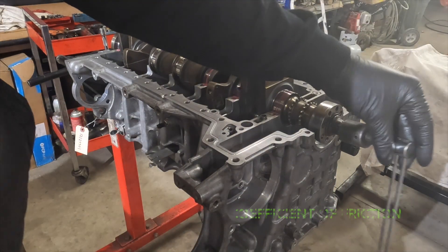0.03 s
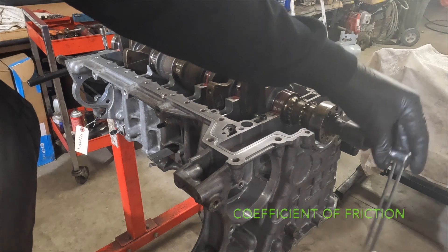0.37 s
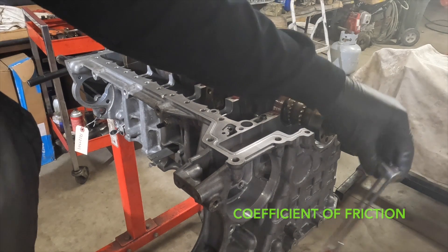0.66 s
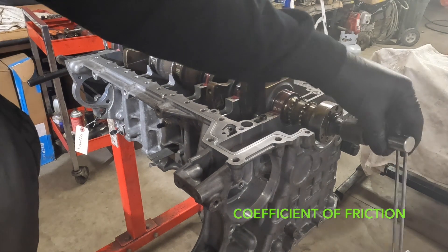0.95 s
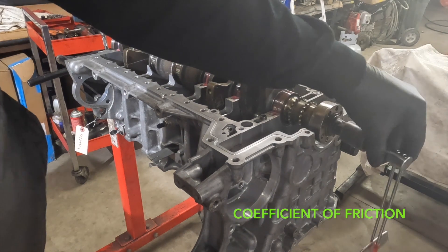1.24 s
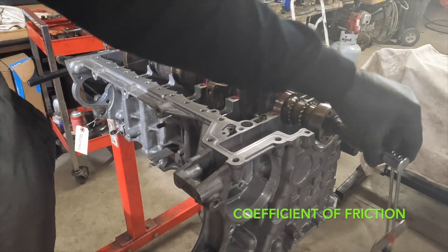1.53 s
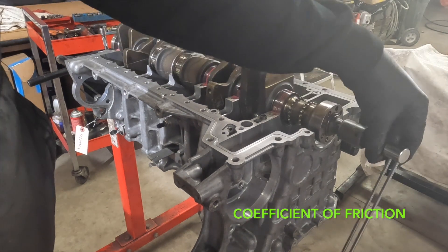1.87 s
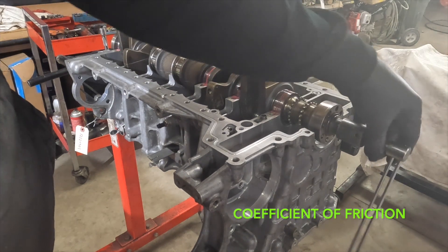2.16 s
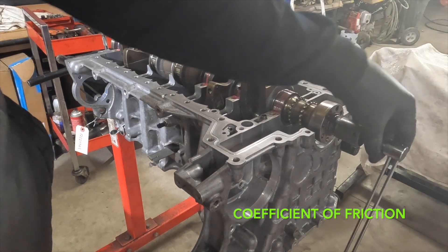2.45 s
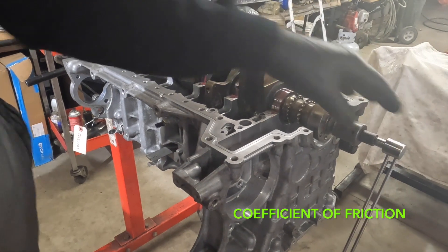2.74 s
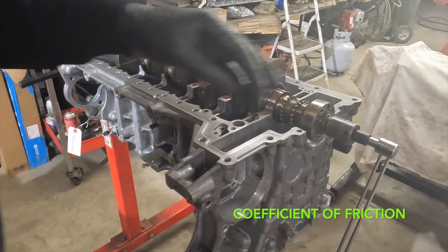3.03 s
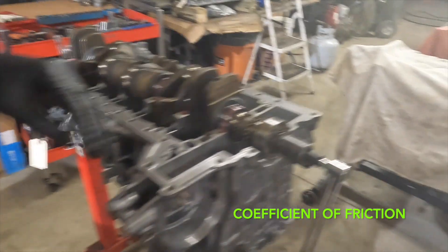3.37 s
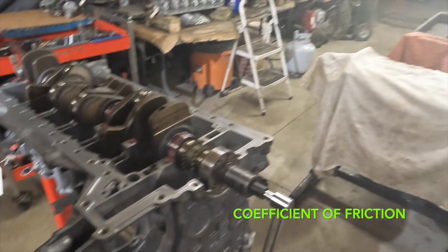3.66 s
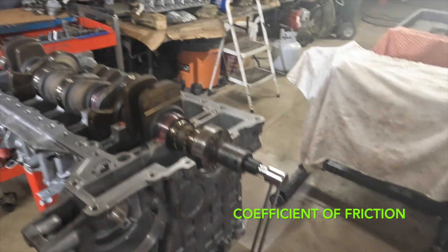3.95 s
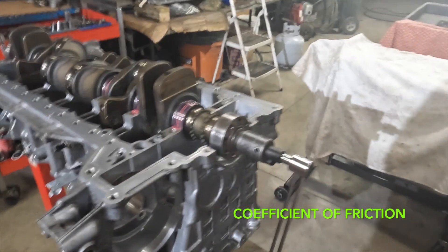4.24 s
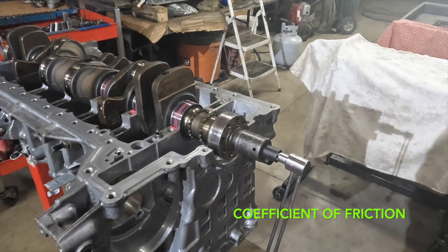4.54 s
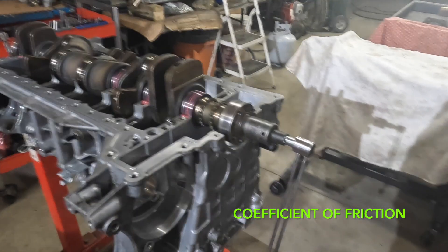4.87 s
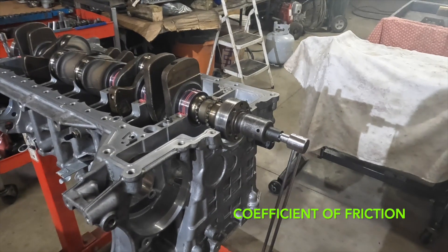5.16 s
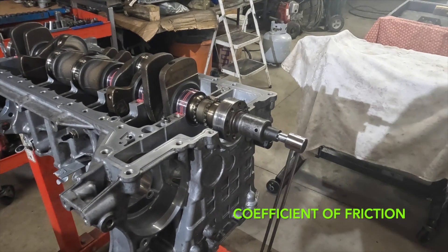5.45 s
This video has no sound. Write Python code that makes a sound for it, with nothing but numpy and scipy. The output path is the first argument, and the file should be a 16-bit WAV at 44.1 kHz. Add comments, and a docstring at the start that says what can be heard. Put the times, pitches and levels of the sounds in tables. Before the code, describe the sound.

A low, steady workshop room tone runs throughout. Right at the start, a quick cluster of steel clicks sounds as a socket and wrench meet an engine's crankshaft, each ringing briefly with a slight room echo. Lighter ticks and faint sliding scrapes follow, with clicks near 0.5, 0.8 and 1.2 seconds, a sharp one at 1.8 and another at 2.3. A sleeve then brushes softly past.

From about 2.8 seconds a gloved hand takes the microphone's mount, and a very close, low rumble begins, with rubbing and cloth swishes. Dull knocks land around 3.5 seconds. The loudest thumps come at 4.1 and 4.3, along with small plastic snaps and glove scuffs. More rubbing leads to another knock near 4.9 seconds. The rumble eases after about 5.3 seconds, leaving a soft fabric swish to the end.

```python
"""First a socket and torque wrench are worked onto the nose of a crankshaft in a workshop:
steel clicks on steel, and the tool and engine block ring. After about two seconds a sleeve brushes
past the camera. Then a gloved hand takes hold of its mount and re-aims it, so the mount rumbles,
rubs and knocks right at the microphones. A low room tone lies under it all."""
import sys
import numpy as np
from scipy import signal
from scipy.fft import rfft, irfft, next_fast_len
from scipy.io import wavfile
from scipy.ndimage import uniform_filter1d

SR = 44100
rng = np.random.default_rng(int(sys.argv[2]) if len(sys.argv) > 2 else 0)


def store_pcm(level_fs):
    """Save levels as 16-bit WAV."""
    pcm = np.round(np.clip(level_fs, -1, 1) * 32767).astype(np.int16)
    wavfile.write(sys.argv[1], SR, np.atleast_2d(pcm).T)


N = 242902
T = np.arange(N) / SR

# The functions shift the levels below up or down. A fade time (t60) is the time to fall by 60 dB.
# steel hits steel: (time [s], middle [dB], low body [dB], bright edge [dB], crankshaft ring [dB])
CLICKS = [(0.1491, -22, -36, -42.5, -53), (0.1712, -24, -34.5, -38.5, -43), (0.1993, -31, -39.5, -49, -46),
          (0.242, -24.5, -33.5, -46, -43), (0.4827, -42, -46.5, -81, -63), (0.5428, -33.5, -41, -61, -51),
          (0.619, -54, -51, -76, -80), (0.6814, -53, -58, -68, -82), (0.6943, -49, -54.5, -68, -64),
          (0.841, -33, -41, -63.5, -39), (0.9202, -45.5, -42, -70, -67), (1.2226, -41, -44, -60.5, -61),
          (1.5473, -66, -68, -91, -67), (1.6329, -52.5, -52.5, -76, -60), (1.8145, -18.5, -28.5, -37, -46),
          (1.8212, -36, -37.5, -49, -40), (2.0782, -65, -55, -73, -63), (2.151, -43, -43.5, -67, -56.5),
          (2.245, -51, -54.5, -67.5, -76), (2.2862, -40.5, -36.5, -49, -47), (2.3, -32, -31.5, -49.5, -39)]
# ringing tones of wrench and block, crankshaft, and socket: (pitch [Hz], level [dB], fade time [s])
STEEL_TONES = [(1125, -12, .16), (1265, -2, .14), (1744, -12, .2), (2056, -11, .16), (2168, -5, .12),
               (2307, -1, .1), (2400, -2, .12), (2546, -10, .2), (2605, -1, .16), (3133, -2, .16),
               (3210, -11, .2), (3628, -15, .17), (7111, -10, .05), (7569, -8, .05)]
CRANK_TONES = [(674, 3, 0.13), (712, 19, 0.18), (750, 3, .06)]
SOCKET_TONES = [(3900, -6, .12), (4050, 3, .15), (4337, -3, .19), (4480, -1, .18), (4720, -9, .14),
                (4768, -9, .15), (4968, -6, .16)]
# the burst of noise in a click: (frequency [Hz], level [dB])
CLICK_COLOUR = [(200, -13.5), (320, 3.5), (400, -5.5), (500, 5.5), (620, -3), (900, 0), (1300, 7),
                (1650, 3.5), (2400, 16), (3700, 2), (4600, 1), (5800, -6), (7600, -23.5), (9000, -28.5),
                (15000, -53.5)]
# the socket slides on its seat; the two short rows at 0.235 s and 1.803 s are weak clicks, sounded as brief
# grainy bursts: (middle time [s], half length [s], level [dB], pitch [Hz])
SLIDES = [(.235, 0.013, -42, 2330), (.51, 0.08, -60, 5760), (0.499, 0.12, -60, 1900),
          (0.821, 0.093, -59.5, 2340), (1.719, 0.21, -70.5, 2230), (1.803, 0.016, -38.5, 1610),
          (2.307, 0.023, -42.5, 6100)]

# the hand pushes the mount:
# (time [s], rise [s], hold [s], sway [dB], shudder [dB], rubbing [dB], left minus right [dB])
PUSHES = [(2.775, 0.031, 0.13, -27, -40, -70.5, -5), (2.94, 0.048, 0.072, -30.5, -40.5, -60, -17.5),
          (3.14, 0.079, 0.078, -26.5, -45, -62, -5), (3.412, 0.084, 0.056, -18.5, -31, -53.5, -5.5),
          (4.088, 0.03, 0.0093, -23, -27, -45, -1), (4.299, 0.016, .11, -24, -27, -66, -2),
          (4.608, 0.18, 0.094, -28, -27.5, -40.5, 3), (4.917, 0.023, 0.021, -26.5, -23, -60, 1.5),
          (5.124, 0.088, 0.028, -27, -31.5, -50, -0.5)]
# the swaying mount, its shuddering arm and the rubbing glove: (frequency [Hz], level [dB])
SWAY_COLOUR = [(15, -23.5), (28, -2), (38, 4.5), (55, -3.5), (80, -13.5), (130, -30.5), (400, -94)]
SHUDDER_COLOUR = [(50, -19.5), (90, -3), (112, 2), (140, -4.5), (210, -7.5), (260, -24.5), (310, -19.5),
                  (380, -36.5), (800, -76)]
RUB_COLOUR = [(70, -7.5), (125, 19), (220, 4.5), (300, 5), (380, -10), (560, -1), (680, -3.5), (850, -19.5),
              (1070, 0.5), (1300, -42), (1600, -20), (2300, -27.5), (4000, -60)]
# knocks on the mount: (time [s], thud [dB], casing [dB], left minus right [dB])
KNOCKS = [(2.955, -35, -53.5, 0), (3.247, -42, -49.5, -11.5), (3.497, -25, -38.5, 2),
          (3.524, -24, -51, -16), (3.989, -30.5, -42, 3), (4.071, -32, -40, 0.5),
          (4.122, -14.5, -27.5, -11), (4.312, -17, -31, -4.5), (4.35, -22.5, -37.5, 0.5),
          (4.437, -24, -49.5, -4), (4.505, -32.5, -54, 2.5), (4.596, -43, -56, 3.5),
          (4.671, -30.5, -46.5, 2), (4.938, -21, -31.5, 1.5), (5.014, -50.5, -49, 4), (5.03, -46, -47, 1),
          (5.202, -32.5, -69, 7)]
# ringing tones of the mount, its arm and the camera casing: (pitch [Hz], level [dB], fade time [s])
MOUNT_TONES = [(37.7, 29, 0.4), (57.6, -17, 0.25)]
ARM_TONES = [(111, 14.5, 0.093), (155, 12, 0.063), (200.3, 7, 0.24), (283.3, -4, 0.34)]
CASING_TONES = [(420, -13.5, 0.082), (501, -12, 0.19), (566, -1, 0.053), (690, 21.5, 0.0068),
                (993, 1, 0.038), (1062, 1, 0.1), (1280, -18, .02), (1560, -5.5, 0.038)]
# plastic joints snap: (time [s], level [dB], pitch [Hz])
SNAPS = [(3.371, -38, 3350), (3.9913, -54, 2420), (4.0705, -42, 1380), (4.1223, -26.5, 2060),
         (4.1227, -34, 5300), (4.3615, -41, 2600), (4.3624, -54, 8500), (4.954, -49.5, 13500),
         (4.9535, -47.5, 3480), (5.013, -54, 2480)]

# strokes of sleeve and glove:
# (time [s], rise [s], hold [s], fade time [s], swish [dB], hiss [dB], swish left minus right [dB])
STROKES = [(2.2, 0.39, .5, 4.4, -64.5, -60.5, 20.5), (3.261, 0.12, 0.0084, 0.51, -45.5, -59.5, 4),
           (3.49, 0.021, 0.017, 0.46, -53, -47.5, 5.5), (3.862, 0.16, 0.021, 0.47, -49, -48.5, 9.5),
           (4.053, 0.076, 0.016, 0.15, -45, -45.5, 12), (4.132, 0.081, 0.013, 1.11, -60, -62.5, 19),
           (4.663, 0.019, 0.032, 0.29, -50, -69.5, 1.5), (4.703, 0.073, 0.19, 0.084, -59.5, -75, 3.5),
           (4.999, .02, 0.015, 0.2, -57, -73, 4), (5.118, 0.13, 0.0084, 0.28, -44.5, -64, 5),
           (5.264, 0.3, .05, .5, -47.5, -60, 5)]
# the cloth's coarse swish and fine hiss: (frequency [Hz], level [dB])
SWISH_COLOUR = [(400, -18), (850, -7.5), (1300, 4.5), (2200, 2), (4200, -2.5), (5500, -9), (8000, -31.5)]
HISS_COLOUR = [(3000, -6.5), (5300, -0.5), (7200, -5), (9000, -14), (11000, -18.5), (12300, -17),
               (14000, -29), (15500, -64)]
# the glove scuffs the casing: (middle time [s], half length [s], level [dB], pitch [Hz])
SCUFFS = [(3.052, 0.034, -48, 2870), (3.52, 0.055, -48.5, 536), (4.01, 0.038, -42.5, 3620),
          (4.078, 0.01, -40, 1320), (4.135, 0.027, -29, 290), (4.145, 0.036, -36.5, 470),
          (4.83, 0.03, -56, 1580), (4.97, 0.034, -35, 208), (5.18, 0.046, -46.5, 1580)]

# the building's murmur: (frequency [Hz], level [dB])
ROOM_COLOUR = [(15, -21), (30, 3), (62, 1), (110, -12.5), (180, -13), (300, -16), (450, -25.5),
               (750, -33.5), (1300, -32.5), (3200, -44), (7000, -43), (10500, -53), (15000, -59)]
# how the left microphone opening shapes the sound: (frequency [Hz], boost [dB])
PORT_COLOUR = [(20, -1), (7000, -1.5), (10500, 1), (12200, 5.5), (14000, 2)]


def wrench(clash_t60=0.059, crack_t60=0.01, rise_s=0.00033):
    """Each contact cracks, sets off the block's many tones and leaves crankshaft and socket ringing."""
    out, t = scrapes(SLIDES, grain_db=4.5), T[:SR // 3]
    fade = (undb(-60 * t / clash_t60) + undb(3 - 60 * t / crack_t60)) * (1 - np.exp(-t / rise_s))
    for s, middle, body, edge, crank in CLICKS:
        clash = colour(noise(len(t), 0.268) * fade, CLICK_COLOUR)
        hit = clash + undb(-13) * ring(STEEL_TONES, t, scatter_db=1.5, detune=0.006)
        # where and how hard the parts meet sets the share of low, middle and high sound
        add(out, s, peak(band(hit, 200, 1615, order=3), body))
        add(out, s, peak(band(hit, 1740, 3710, order=3), middle - 2))
        add(out, s, peak(band(hit, 5700, 12900, order=4), edge))
        add(out, s, peak(ring(CRANK_TONES, t, scatter_db=-1.5, detune=0.005), crank))
        socket_db = edge + 8 + 0.19 * middle  # bright, loud clicks ring the socket most
        add(out, s, peak(ring(SOCKET_TONES, t, scatter_db=7.5, detune=0.001), socket_db))
        add(out, s, peak(band(clash, 4370, 4480), socket_db + 1))
    return out * pan(0.59)


def grip(close_s=0.045, sway_t60=0.47, shudder_t60=0.26, rub_t60=0.29):
    """The hand shakes the mount, and the glove sticks and slips on the casing."""
    # once the fingers close, even the resting hand trembles a little
    held = np.clip((T - PUSHES[0][0]) / close_s, 0, 1) * pan(-0.81)
    sway, shudder, rub = (held * undb(db) for db in (-41.5, -56, -82.5))
    for s, rise, hold, sway_db, shudder_db, rub_db, side in PUSHES:
        sway = sway + pan(side) * undb(sway_db) * swell(s, rise, hold, sway_t60)
        shudder = shudder + pan(side) * undb(shudder_db) * swell(s, rise, hold, shudder_t60)
        rub = rub + pan(side) * undb(rub_db) * swell(s, rise, hold, rub_t60)
    # the noise is evened out, so the hand's force sets the size of the motion
    mount = steady(colour(noise(N, 0.044), SWAY_COLOUR), size=2400) * sway
    jerks = noise(N, 0.05) * undb(6.6 * wander(45))
    arm = steady(colour(jerks, SHUDDER_COLOUR), size=2400) * shudder * undb(2 * wander(20))
    slips = noise(N, 0.04) * undb(2 * wander(110) + 3 * wander(1500))
    rubbing = colour(slips, RUB_COLOUR)
    rubbing = rubbing / band(rubbing, 400, 1200).std()
    casing_ring = ring(CASING_TONES, T[:SR // 4], scatter_db=1)
    casing = unit(signal.fftconvolve(slips, casing_ring[None], axes=1)[:, :N])  # every slip rings it
    return mount + arm + rub * (rubbing + undb(-6) * casing)


def knocks(rattle_t60=0.097, snap_t60=0.029, rise_s=0.0026, hum_hz=114, hum_t60=0.98):
    """A knock swings the mount, shakes its arm and rings the casing; the plastic joints snap."""
    out, t = np.zeros((2, N)), T[:SR // 3]
    for s, thud_db, casing_db, side in KNOCKS:
        rattle = unit(band(noise(len(t), 0.9), 300, 1300, order=3)) * undb(-1 - 60 * t / rattle_t60)
        # each microphone sits at its own place on the casing and feels the tones differently
        casing = np.array([ring(CASING_TONES, t, scatter_db=6.5, detune=0.026) for _ in range(2)])
        arm = np.array([ring(ARM_TONES, t, scatter_db=-0.5, detune=0.051) for _ in range(2)])
        add(out, s, pan(side) * peak((casing + rattle) * (1 - np.exp(-t / rise_s)), casing_db + 2))
        add(out, s, pan(side * 0.99) * peak(-arm, thud_db - 1, size=400))
        add(out, s, pan(side / 2) * peak(-ring(MOUNT_TONES, t, scatter_db=-1), thud_db - 1, size=700))
    hum = undb(-25.5 - 60 * T / hum_t60) * np.sin(2 * np.pi * hum_hz * T)
    add(out, 3.52, pan(-2) * hum)  # lingers after the hardest swing
    for s, db, hz in SNAPS:
        burst = noise(len(t), 0.5) * undb(-60 * t / snap_t60)
        add(out, s, peak(band(burst, hz / np.sqrt(2), hz * np.sqrt(2), order=3), db))
    return out


def cloth(flutter_db=1.5, grain_db=1.0):
    """Countless fibres catch and let go as the sleeve slides by; the glove adds short scuffs."""
    swish, hiss = 0, 0
    for s, rise, hold, t60, swish_db, hiss_db, side in STROKES:
        speed = swell(s, rise, hold, t60)
        swish = swish + speed * undb(swish_db - 2) * pan(side)
        hiss = hiss + speed * undb(hiss_db - 0.5)
    fibres = undb(flutter_db * wander(60) + grain_db * wander(2500))
    coarse = unit(colour(noise(N, 0.037) * fibres, SWISH_COLOUR)) * swish
    fine = unit(colour(noise(N, 0.45) * fibres, HISS_COLOUR)) * hiss * pan(3.1)
    return coarse + fine + scrapes(SCUFFS, grain_db=3.0)


def scrapes(table, grain_db):
    """Sliding surfaces stick and slip very fast, making short swells of grainy noise."""
    out = np.zeros((2, N))
    for s, half_length, db, hz in table:
        count = int(2 * half_length * SR)
        grains = noise(count, 0.117) * undb(grain_db * wander(900)[:count])
        scrape = band(grains, hz * 0.68, hz * 1.275)
        add(out, s - half_length, undb(db) * unit(scrape) * np.hanning(count) ** 2)
    return out


def workshop(x, echo_db=-11, low_t60=0.22, high_t60=0.23):
    """Cluttered walls throw the sound back as a short wash of echoes."""
    t = T[:SR // 2]
    low = band(noise(len(t), 0.8), 200, 4500) * undb(-60 * t / low_t60)
    high = band(noise(len(t), 0.8), 4500, 12000) * undb(-60 * t / high_t60)
    tail = (low + high) * np.clip(t / 0.0053, 0, 1)
    tail = tail / np.sqrt(np.sum(tail ** 2) / 2)
    return x + undb(echo_db) * signal.fftconvolve(x, tail, axes=1)[:, :N]


def room_tone(murmur_db=-52, whine_db=-82, whine_hz=9440, whine_end_s=3.27):
    """The building murmurs steadily; a thin electric whine stops partway through."""
    air = noise(N, 0.33) + 0.2 * band(rng.standard_normal((2, N)), 2000, 17000)
    murmur = steady(colour(air, ROOM_COLOUR), size=12000) * undb(murmur_db) * pan(0.031)
    whine = np.sin(2 * np.pi * np.cumsum(whine_hz + 12 * wander(30)) / SR)
    whine_on = np.clip((whine_end_s - T) / 0.045, 0, 1)
    return murmur + undb(whine_db) * whine * whine_on * pan(-2)


def ring(tones, t, scatter_db, detune=0):
    """A struck part's fading tones; each blow mixes them anew, and a changing load shifts their pitch."""
    chance = rng.standard_normal((len(tones), 2))
    return sum(undb(db + scatter_db * size - 60 * t / t60)
               * np.sin(2 * np.pi * hz * (1 + detune * shift) * t)
               for (hz, db, t60), (size, shift) in zip(tones, chance))


def swell(s, rise, hold, t60):
    """Strength of one movement: it builds from time s, holds and dies away."""
    return np.clip((T - s) / rise, 0, 1) ** 2 * undb(-60 * np.maximum(T - s - rise - hold, 0) / t60)


def noise(count, apart):
    """Left and right noise: the same when apart is 0, unrelated when it is 1."""
    mid, side = rng.standard_normal((2, count))
    return np.array([mid + apart * side, mid - apart * side])


def wander(rate):
    """A random curve of size about 1 that glides to a new value rate times a second."""
    step = max(int(SR / rate), 1)
    stairs = np.repeat(rng.standard_normal(N // step + 1), step)
    return unit(uniform_filter1d(stairs, step)[:N])


def band(x, lo_hz, hi_hz, order=2):
    """Keep the sound between two frequencies."""
    sos = signal.butter(order, [lo_hz, min(hi_hz, SR / 2 - 1)], "band", fs=SR, output="sos")
    return signal.sosfilt(sos, x)


def colour(x, points):
    """Shape bass and treble along a curve of (frequency [Hz], level [dB]) points."""
    count = 2 * next_fast_len(x.shape[-1])
    hz, db = np.transpose(points)
    curve_db = np.interp(np.log(np.arange(count // 2 + 1) * SR / count + 1), np.log(hz), db)
    cepstrum = irfft(np.log(undb(curve_db)))
    # fold it so that the filter rings only after a sound, never before
    cepstrum[1:count // 2] *= 2
    cepstrum[count // 2 + 1:] = 0
    return irfft(rfft(x, count) * np.exp(rfft(cepstrum)))[..., :x.shape[-1]]


def undb(db):
    """Turn decibels into a multiplier."""
    return 10 ** (np.asarray(db) / 20)


def unit(x):
    """Scale to an average size (rms) of 1."""
    return x / np.sqrt(np.mean(x ** 2))


def peak(x, db, size=128):
    """Scale so that the loudest stretch of size samples has this level."""
    power = np.mean(np.atleast_2d(x) ** 2, axis=0)
    return x * undb(db) / np.sqrt(uniform_filter1d(power, size).max())


def steady(x, size):
    """Hold the level even over stretches of size samples."""
    return x / np.sqrt(uniform_filter1d(np.mean(x ** 2, axis=0), size))


def pan(db):
    """Multipliers that make the left side db louder than the right."""
    return undb(np.reshape([db / 2, -db / 2], (2, -1)))


def add(out, s, x):
    """Mix x into out from time s."""
    i = max(int(s * SR), 0)
    out[:, i:i + x.shape[-1]] += x[..., :N - i]


def scene():
    """The tool in the room, and the handling right at the microphones."""
    return workshop(wrench()) + grip() + knocks() + cloth() + room_tone()


def record(dry, top_hz=15000):
    """The left microphone opening rings in the treble, the right is duller; the very top is cut off."""
    left = colour(dry[0], PORT_COLOUR)
    right = colour(dry[1], [(hz, -0.4 * db) for hz, db in PORT_COLOUR])
    top_cut = signal.ellip(8, 0.2, 70, top_hz, fs=SR, output="sos")
    return signal.sosfilt(top_cut, np.array([left, right]))


dry = scene()
out = record(dry)
store_pcm(out)
```